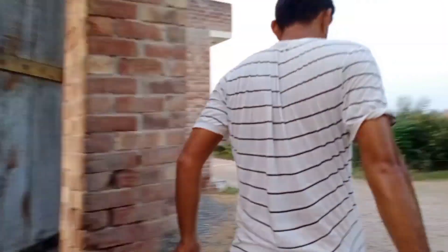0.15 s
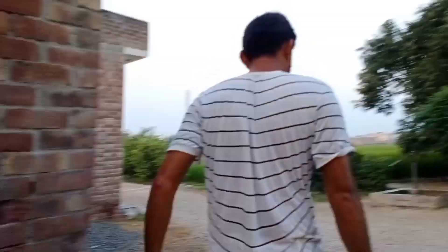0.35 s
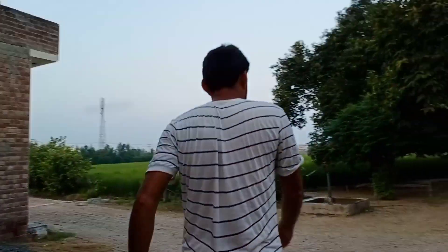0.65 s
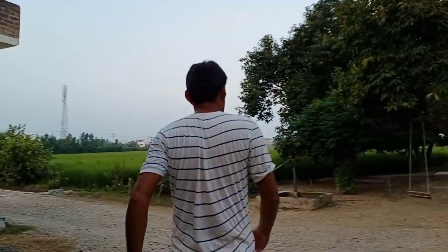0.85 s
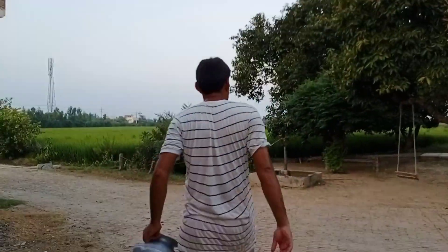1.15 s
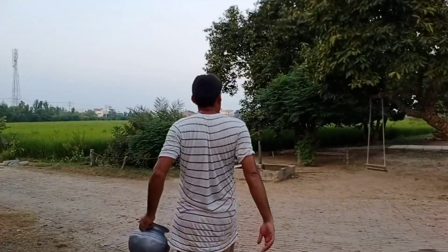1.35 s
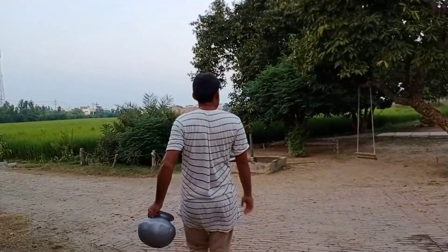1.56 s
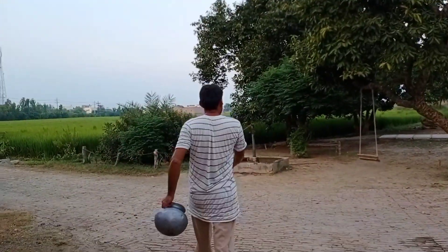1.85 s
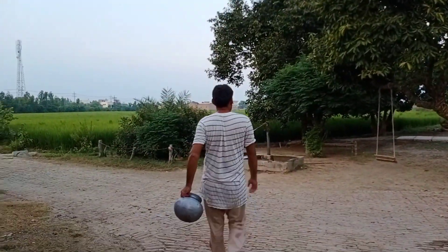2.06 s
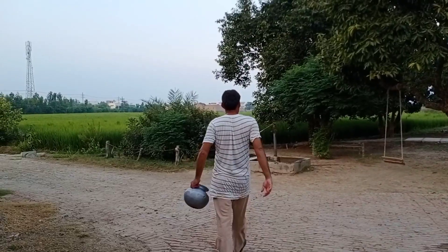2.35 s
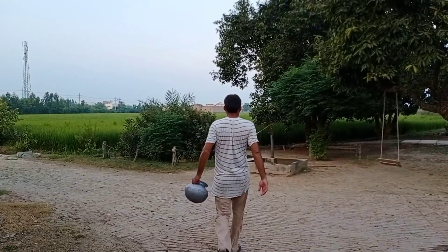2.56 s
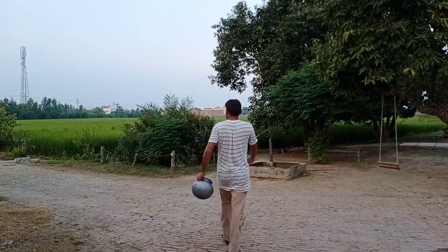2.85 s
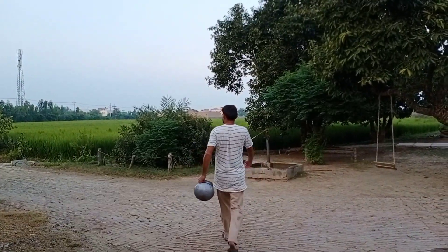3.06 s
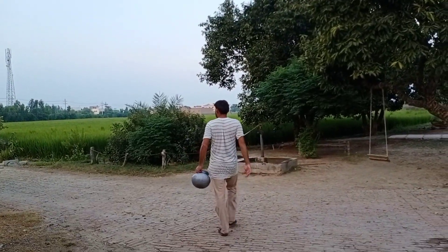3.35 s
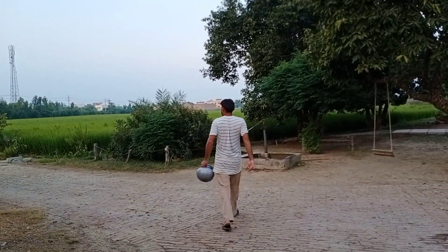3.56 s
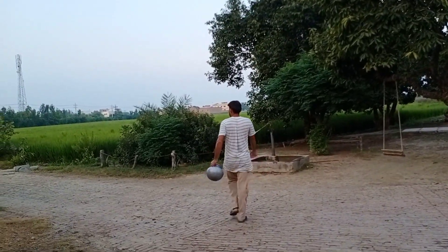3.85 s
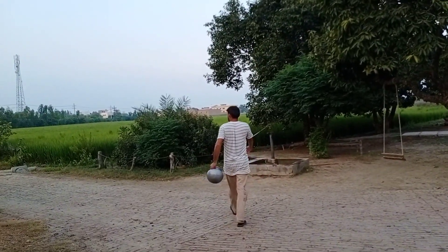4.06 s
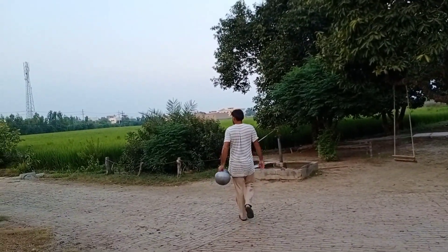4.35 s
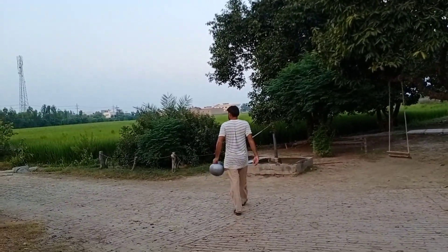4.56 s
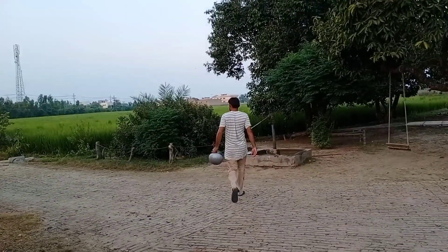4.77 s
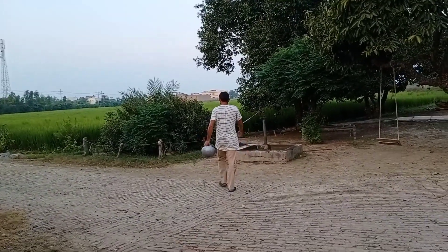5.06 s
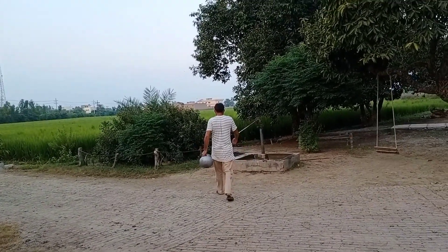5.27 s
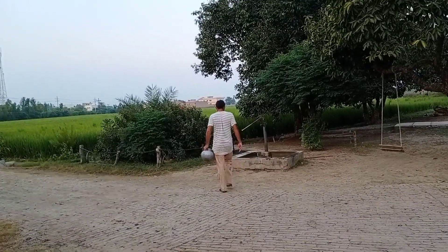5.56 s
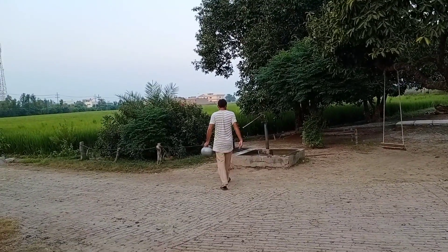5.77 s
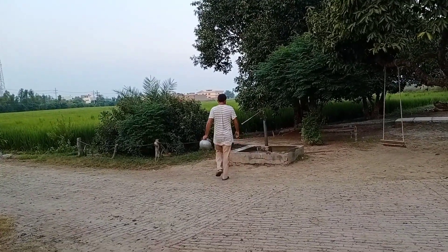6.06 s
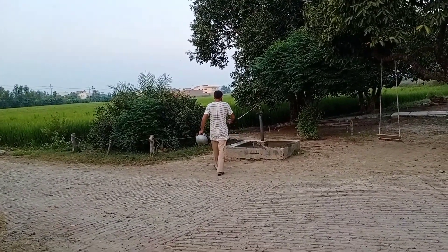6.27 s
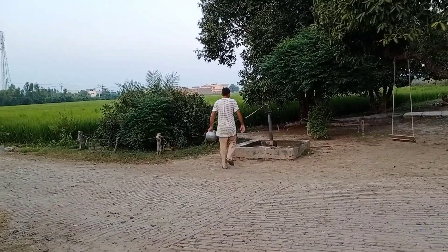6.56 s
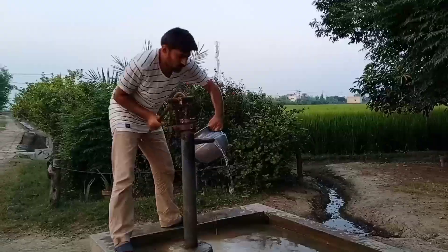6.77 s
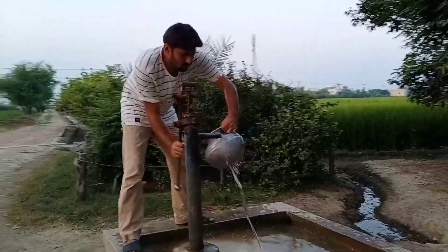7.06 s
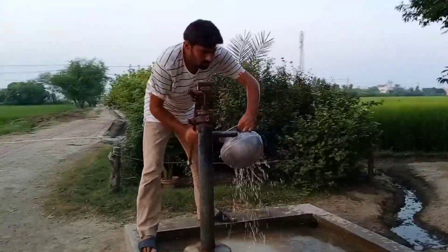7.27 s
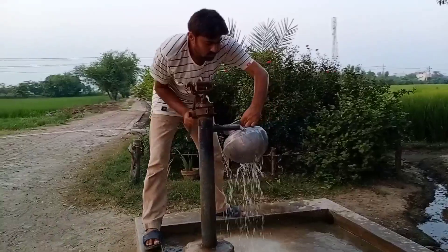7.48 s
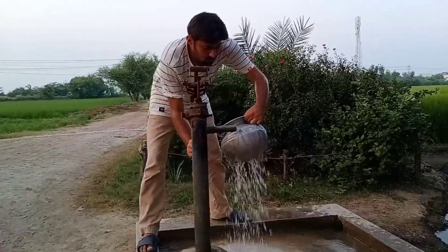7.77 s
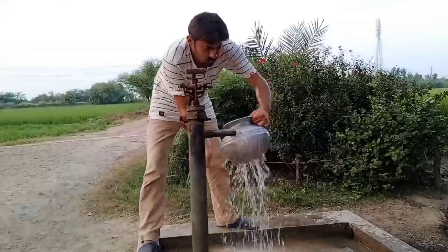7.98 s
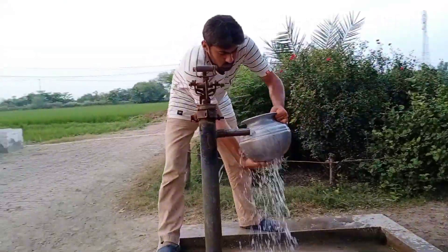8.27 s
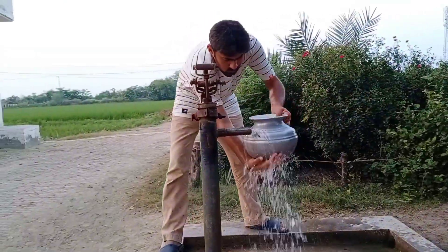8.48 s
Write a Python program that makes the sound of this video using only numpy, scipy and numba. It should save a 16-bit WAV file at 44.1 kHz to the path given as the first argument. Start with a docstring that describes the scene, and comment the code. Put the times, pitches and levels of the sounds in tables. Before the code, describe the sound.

Outdoors in a farmyard, sandals scuff gritty ground while a hen clucks softly and small birds chirp. The hen gives a thin rising whine, then a run of hoarse squawks over a faint low rumble. An abrupt cut brings a close iron hand pump, clanking and squeaking, a metal pot knocking on its spout, and water gurgling, spurting and splashing into a concrete trough.

```python
"""Sandals scuff grit in a farmyard while a hen clucks softly and small birds chirp; she whines, then squawks.
Then, close by, an iron hand pump clatters and a metal pot knocks on its spout; water gurgles and spills.
Scuffs and iron strikes are shaped noise, with ringing modes for the metal; birds are gliding tones.
The hen is a pulse train through moving throat and windpipe resonances. The water is ticks, bubbles and
spray, with plops and slapping drops in a wet concrete trough. A soft open-air bed and a rumble lie under it."""
import sys
import numpy as np
from scipy import signal
from scipy.fft import rfft, irfft
from scipy.io import wavfile
from numba import njit

SR = 44100
rng = np.random.default_rng(int(sys.argv[2]) if len(sys.argv) > 2 else 0)


def materialize(psi):
    """Save the field psi as 16-bit PCM at rate SR to the path in sys.argv[1].

    A 1-D psi becomes a single channel; in a 2-D psi each row is a channel.
    """
    bounded = np.clip(np.atleast_2d(psi).T, -1, 1)
    quanta = np.round(bounded * 32767).astype(np.int16)
    wavfile.write(sys.argv[1], SR, quanta)


N = 380583
T = np.arange(N) / SR
WATER_START_S = 6.634
# water leaving the pot, a spurt with each of the first strokes, then a steady spill: (time [s], level [dB])
FLOW_COURSE = [(6.66, -44), (6.82, -59), (7.0, -37.5), (7.13, -54.5), (7.36, -37.5), (7.75, -40.5),
               (7.79, -41.5), (7.86, -35), (8.05, -36.5), (8.63, -36.5)]


def undb(db):
    """Decibels to gain."""
    return 10 ** (np.asarray(db) / 20)


def unit(x):
    """Scale to a standard deviation of 1."""
    return x / (np.std(x) + 1e-12)


def curves(table, t=T):
    """The columns of a table, joined by straight lines in time."""
    s, *columns = np.transpose(table)
    return [np.interp(t, s, column) for column in columns]


def add(out, s, sound):
    """Mix a sound in at time s."""
    i = max(int(s * SR), 0)
    out[i:i + len(sound)] += sound[:max(N - i, 0)]


def colour(x, points):
    """Causal minimum-phase filter of the given (Hz, dB) shape; white noise keeps its level."""
    hz, db = np.transpose(points)
    size = 4096
    bins_hz = np.arange(size // 2 + 1) * SR / size
    gain = undb(np.interp(np.log(bins_hz + 1), np.log(hz), db))
    # folding the cepstrum forward puts the energy as early as possible
    cepstrum = irfft(np.log(gain))
    cepstrum[1:size // 2] *= 2
    cepstrum[size // 2 + 1:] = 0
    response = irfft(np.exp(rfft(cepstrum)))
    return signal.fftconvolve(x, response / np.linalg.norm(response))[:len(x)]


def noise(points):
    """Coloured noise of rms about 1."""
    return colour(rng.standard_normal(N), points)


def walk(rate):
    """Smooth chance with spread 1, heading for a new value rate times a second."""
    return unit(np.interp(T * rate, np.arange(N // 8), rng.standard_normal(N // 8)))


def fade(t, t60):
    """Free decay, 60 dB down at t60."""
    return np.exp(-np.log(1000) * t / t60)


def swell(t, rise, t60):
    """A contact builds up and dies away."""
    return np.minimum(t / rise, 1) * fade(np.maximum(t - rise, 0), t60)


def blows(rows):
    """Envelope of contacts (s, dB, rise s, t60 s), overlaps summed as power."""
    power, t = np.zeros(N), T[:SR // 2]
    for s, db, rise, t60 in rows:
        add(power, s - rise, (undb(db) * swell(t, rise, t60)) ** 2)
    return np.sqrt(power)


def bursts(rows, t60, spread):
    """Short dying noise bursts around one pitch; spread is the frequency ratio at which they are 9 dB down."""
    out, t = np.zeros(N), T[:SR // 4]
    for s, db, hz in rows:
        below = [(hz / spread ** 3, -34), (hz / spread, -9)]
        above = [(hz * spread, -9), (hz * spread ** 3, -28), (hz * spread ** 8, -55)]
        burst = rng.standard_normal(len(t)) * fade(t, t60)
        add(out, s, undb(db) * colour(burst, below + [(hz, 0)] + above))
    return out


def whistles(rows, waver, flutter_db, octave_db):
    """Short gliding tones (s, length s, first Hz, last Hz, dB), unsteady in pitch and strength."""
    out, wobble, flutter = np.zeros(N), walk(350), walk(180)
    for s, length, first_hz, last_hz, db in rows:
        on = slice(int(s * SR), int((s + length) * SR))
        u = np.linspace(0, 1, len(T[on]))
        glide_hz = first_hz + (last_hz - first_hz) * np.sin(u * np.pi / 2)
        phase = 2 * np.pi * np.cumsum(glide_hz * (1 + waver * wobble[on])) / SR
        tone = np.sqrt(2) * (np.sin(phase) + undb(octave_db) * np.sin(2 * phase))
        arch = 2 * np.sqrt(u * (1 - u))
        out[on] += undb(db + flutter_db * flutter[on]) * arch * tone
    return out


def ring(modes, scatter_db, detune):
    """An object's modes (Hz, dB, t60 s), shared out and tuned differently by each place of contact."""
    t = T[:int(SR * max(t60 for _, _, t60 in modes))]
    chance = rng.standard_normal((len(modes), 3))
    gains = undb(np.array(modes)[:, 1] + scatter_db * chance[:, 0])
    tones = np.zeros(len(t))
    for (hz, _, t60), gain, (_, turn, shift) in zip(modes, gains, chance):
        tones += gain * fade(t, t60) * np.sin(2 * np.pi * (hz * (1 + detune * shift) * t + turn))
    return tones * np.sqrt(2) / np.linalg.norm(gains)


def shifting(x, edges_hz, depth_db, rate):
    """Neighbouring bands swell and sink separately; the overall level stays."""
    lows = [0]
    for hz in edges_hz:
        lows.append(signal.sosfiltfilt(signal.butter(4, hz, fs=SR, output="sos"), x))
    lows.append(x)
    bands = [upper - lower for lower, upper in zip(lows, lows[1:])]
    return np.std(x) * unit(sum(band * undb(depth_db * walk(rate)) for band in bands))


def echoes(x, t60, wet_db):
    """Add the scattered reflections of ground, walls and trees as a dying noise tail."""
    t = T[:SR]
    tail = rng.standard_normal(SR) * fade(t, t60) * np.minimum(t / 0.0019, 1)
    return x + undb(wet_db) * signal.fftconvolve(x, tail / np.linalg.norm(tail))[:N]


def countryside():
    """A soft open-air noise bed, over a low distant rumble whose level wavers."""
    # rumble: (time [s], level before rumble_gain_db [dB])
    rumble_course = [(0.0, -87), (0.11, -75), (2.01, -70.5), (2.9, -62), (3.25, -52.5), (4.4, -55),
                     (5.86, -50.5), (6.45, -61.5)]
    # rumble spectrum: (frequency [Hz], relative level [dB])
    rumble_colour = [(25, -27), (50, -1.5), (70, 14), (85, 15), (110, 4.5), (150, -9.5), (220, -16.5),
                     (400, -68.5)]
    # open-air spectrum: (frequency [Hz], relative level [dB])
    field_colour = [(30, -21), (60, -24), (110, 1), (160, -5.5), (220, -16), (310, -11), (410, -22),
                    (700, -14), (1900, -17), (3150, -36.5), (3700, -35.5), (5600, -29), (7800, -40),
                    (8700, -50.5), (12000, -52.5), (15500, -43.5)]
    field_db, rumble_gain_db = -66.5, -2.5
    rumble_db, = curves(rumble_course)
    air = noise(field_colour) * undb(field_db + 0.7 * walk(3.9))
    return air + noise(rumble_colour) * undb(rumble_db + rumble_gain_db + 2.0 * walk(6.9))


def footsteps():
    """Grit crunches under the sole as grainy noise; one longer shuffle drags unevenly and clothes rub with it."""
    # sandals scuffing grit: (time [s], level [dB], t60 [s])
    scuffs = [(0.058, -65, 0.073), (0.081, -54, 0.06), (.094, -58, 0.033), (.192, -58.5, 0.11),
              (0.212, -51, 0.068), (.31, -64, 0.14), (0.656, -58, 0.063), (0.478, -43, 0.047),
              (0.798, -58.5, 0.041), (.851, -58, 0.15), (0.939, -60, 0.17), (1.046, -61.5, 0.061),
              (1.137, -30, 0.0095), (1.143, -45, 0.085), (1.156, -36.5, 0.034), (1.166, -41, 0.026),
              (1.591, -48, 0.038), (1.988, -52, 0.24), (2.007, -47, 0.04), (2.156, -43, 0.024),
              (2.432, -56, 0.017), (2.45, -61, 0.032), (3.441, -60, 0.14), (4.679, -58.5, 0.022),
              (4.698, -47.5, 0.015), (5.48, -61, 0.072)]
    # grit spectrum: (frequency [Hz], relative level [dB])
    grit_colour = [(500, -31), (1200, -33), (2300, -4), (3500, -6), (5000, -2.5), (6800, -1), (8200, -14.5),
                   (10000, -45), (13000, -24), (15500, -13)]
    # the longer shuffle: (time [s], level [dB])
    shuffle_course = [(0, -57), (.14, -69), (.2, -59), (.4, -68), (.7, -79.5), (1.0, -106)]
    # cloth spectrum: (frequency [Hz], relative level [dB])
    rustle_colour = [(150, 2), (900, 5), (1500, 1), (4000, -28)]
    grain_db, uneven_db, scuff_rise_s = 3, 2, 0.0042
    rustle_db = -6.5  # relative to the shuffle
    grit = unit(colour(rng.standard_normal(N) * undb(grain_db * walk(900)), grit_colour))
    shuffle_db, = curves(shuffle_course)
    shuffle = undb(shuffle_db + uneven_db * walk(43.0)) * (T < shuffle_course[-1][0])
    steps = blows([(s, db, scuff_rise_s, t60) for s, db, t60 in scuffs])
    rustle = noise(rustle_colour) * undb(rustle_db + 4 * walk(38.4))
    return grit * (steps + shuffle) + rustle * shuffle


def hen_clucks():
    """Soft clucks: very short tones with a strongly wavering pitch."""
    # (time [s], length [s], first pitch [Hz], last pitch [Hz], level [dB])
    clucks = [(.04, 0.039, 1584, 1435, -52.5), (.058, 0.047, 591, 480, -57.5), (.07, .03, 1080, 890, -61),
              (.275, 0.032, 548, 517, -61), (.278, .05, 1146, 1360, -57), (.445, .045, 1060, 989, -54.5),
              (.5, 0.031, 943, 704, -48.5)]
    return whistles(clucks, waver=.13, flutter_db=4, octave_db=-14)


def yard_knocks_and_cluck():
    """Hollow knocks about the yard, the last a soft cluck of the hen: narrow noise bursts that die quickly."""
    # knocks, and in the last row the cluck: (time [s], level [dB], pitch [Hz])
    knocks = [(.055, -52, 1150), (.212, -55.5, 1150), (.417, -50.5, 1430), (.477, -50.5, 1400),
              (1.158, -50.5, 1260), (1.16, -41.5, 2220), (1.55, -54, 1220), (2.003, -41, 594),
              (5.487, -50, 1130)]
    return bursts(knocks, t60=0.11, spread=1.2)


def small_birds():
    """Short upward slurs, dulled by air and leaves: some near by, fainter ones at random from a flock."""
    # the nearer chirps: (time [s], length [s], starting pitch [Hz], relative level [dB])
    chirps = [(0.414, 0.021, 2105, -54.5), (0.507, 0.064, 2490, -57.5), (0.715, 0.051, 2596, -60),
              (0.775, 0.062, 2565, -56), (0.922, 0.054, 2505, -50.5), (1.114, 0.067, 2376, -58.5),
              (1.204, 0.017, 2690, -59), (1.391, 0.024, 2090, -56.5), (1.424, 0.0306, 2684, -63),
              (1.605, 0.044, 1913, -56), (1.263, 0.044, 2710, -68), (1.966, 0.034, 1900, -53),
              (2.291, 0.086, 2560, -64.5), (3.633, 0.054, 2016, -59), (4.1, 0.04, 3130, -58.5),
              (4.992, 0.0546, 2110, -56.5), (5.157, 0.079, 2516, -52.5), (5.311, 0.092, 2530, -53),
              (5.423, 0.074, 2590, -62), (0.324, 0.033, 2204, -59), (5.831, 0.03, 2510, -60),
              (6.069, 0.029, 1680, -75), (6.334, 0.023, 2450, -65.5)]
    chirp_rise = 1.16  # last pitch over first
    flock_per_s, flock_chirp_s, flock_low_hz, flock_high_hz = 7.3, 0.032, 2050, 3170
    flock_db, flock_scatter_db = -74, 0.5  # on the same scale as the nearer chirps
    chance = rng.random((100, 3))
    times = np.cumsum(.5 + chance[:, 0]) / flock_per_s
    flock = []
    for s, (_, pitch, size) in zip(times, chance):
        if s < WATER_START_S:
            hz = flock_low_hz * (flock_high_hz / flock_low_hz) ** pitch
            flock.append((s, flock_chirp_s, hz, flock_db + flock_scatter_db * (2 * size - 1)))
    slurs = [(s, length, hz, hz * chirp_rise, db) for s, length, hz, db in chirps + flock]
    song = whistles(slurs, waver=.02, flutter_db=4, octave_db=-27)
    return .9 * signal.sosfilt(signal.butter(4, 6000, fs=SR, output="sos"), song)


def rasping_birds():
    """Harsh calls: both sides of the syrinx sound at once, chopped by a fast unsteady buzz."""
    # (time [s], lower starting pitch [Hz], upper starting pitch [Hz], level of the lower voice [dB])
    rasps = [(1.6,2126,4260,-57), (1.826,3540,5260,-59.5), (2.48,2340,4100,-61), (2.655,2080,3720,-61.5),
             (2.83,2750,5640,-63.5), (3.19,2320,4060,-64), (3.77,3360,4100,-63.5), (3.99,3930,5380,-57),
             (4.1,2110,4080,-61.5), (4.381,3030,4500,-69), (4.99,2330,4150,-64), (5.575,1775,3034,-62),
             (5.765,1760,3140,-62), (5.901,3380,4330,-64), (6.07,1857,4420,-65), (6.255,1880,3260,-63.5),
             (6.415,2210,2930,-63.5)]
    rasp_s, buzz_hz, upper_db, glide = 0.0564, 615, -7, 1.07
    rows = []
    for s, low_hz, high_hz, db in rasps:
        rows.append((s, rasp_s, low_hz, low_hz * glide, db))
        rows.append((s, rasp_s, high_hz, high_hz * glide, db + upper_db))
    buzz_phase = 2 * np.pi * np.cumsum(buzz_hz * (1 + .2 * walk(200))) / SR
    return (1 + .7 * np.sin(buzz_phase)) * whistles(rows, waver=.04, flutter_db=3, octave_db=-28)


def hen_whine():
    """A thin, drawn-out rising note; the throat favours its second harmonic."""
    # (time [s], pitch [Hz], level [dB])
    whine = [(1.68, 577, -63), (1.70, 592, -60.5), (1.808, 613, -49.5), (1.866, 640, -51.5),
             (1.885, 655, -61), (1.906, 689, -55.5), (1.93, 650, -57), (1.96, 677, -54), (2.01, 657, -45.5),
             (2.056, 664, -45), (2.08, 686, -50.5), (2.098, 719, -46), (2.13, 700, -47), (2.16, 697, -43),
             (2.204, 702, -42), (2.22, 738, -57)]
    hz, db = curves(whine)
    phase = 2 * np.pi * np.cumsum(hz * (1 + 0.0095 * walk(300))) / SR
    harmonics_db = [-16.0, 3.5, -14.5, -42, -24.0]
    tone = sum(undb(h) * np.sin((k + 1) * phase) for k, h in enumerate(harmonics_db))
    return unit(tone) * undb(db + 1.4 * walk(96)) * (T > whine[0][0]) * (T < whine[-1][0])


@njit
def resonate(x, hz, width):
    """A two-pole resonance whose centre moves."""
    y, band, low = np.empty(len(x)), 0., 0.
    for i in range(len(x)):
        g, k = np.tan(np.pi * hz[i] / SR), width / hz[i]
        v = (band + g * (x[i] - low)) / (1 + g * (g + k))
        band, low, y[i] = 2 * v - band, low + 2 * g * v, k * v
    return y


def voice(source, hoarse, throat_hz, pipe_hz):
    """Throat and windpipe resonances slide as neck and beak move: (body, overtones)."""
    # fixed shape of the throat: (frequency [Hz], relative level [dB])
    throat = [(200, -33), (330, -12.5), (420, -29.5), (540, -9.5), (700, -2), (900, -3), (1150, -3),
              (1420, 2.5), (1750, 1), (2100, -4.5), (2400, -16.5), (3000, -50)]
    # windpipe resonances: (multiple of the main one [ratio], width [Hz], relative level [dB])
    windpipe = [(.68, 171, 0.5), (.78, 195, 3.5), (1, 198, 9.5), (1.11, 180, -1.5), (1.378, 160, -3),
                (1.668, 220, -3)]
    # overtones let out by the beak: (frequency [Hz], relative level [dB])
    beak = [(1500, -27.5), (2700, 2), (7000, -1.5), (8500, -12), (11000, -50)]
    peak_db, peak_width_hz = 4, 380.  # the moving resonance, added to the fixed shape
    body = colour(source + hoarse, throat)
    body = body + undb(peak_db) * resonate(body, throat_hz, peak_width_hz)
    top = 0
    for multiple, width, db in windpipe:
        # each resonance strengthens and weakens at random within a squawk
        drift = np.interp(np.linspace(0, 4, len(source)), np.arange(5), rng.standard_normal(5))
        centre_hz = multiple * pipe_hz
        first_pass = resonate(source + hoarse / 2, centre_hz, 1. * width)
        top = top + undb(db + 4 * drift) * resonate(first_pass, centre_hz, 2. * width)
    return unit(body), unit(colour(top, beak))


def hen_squawks():
    """Each squawk opens with a clear yelp, then its pulses beat strong-weak and rasp with shifting roughness."""
    # the voice in each squawk: (pitch in the middle [Hz], share by which the ends lie above it [ratio],
    # roughness [0-1], opening yelp [s], overtones relative to the body [dB], windpipe resonance [Hz])
    squawks = [(566, 0.0029, 0.67, 0.0018, -29, 1500), (526, .06, 0.8, 0.029, -21.5, 4130),
               (667, 0.062, .9, 0.0096, -24.5, 3500), (675, .025, .3, 0.0029, -21.5, 4270),
               (693, .06, 0.97, 0.0027, -21, 4220), (722, 0.033, .65, .015, -21.5, 4200),
               (580, 0.21, .85, 0.0144, -15, 4110), (660, 0.079, .42, 0.011, -17, 4200),
               (719, 0.013, .62, 0.017, -20.5, 4580), (651, 0.083, 0.72, .024, -18.5, 3960),
               (666, 0.085, 0.7, 0.0079, -28, 7100)]
    # the course of each squawk, one list apiece: (time [s], level [dB], throat resonance [Hz])
    courses = [
        [(2.313, -68, 1560), (2.333, -47, 1570), (2.373, -48.5, 1390), (2.441, -44.5, 1410),
         (2.535, -45.5, 1400), (2.583, -38.5, 1460), (2.61, -58, 1400)],
        [(2.672, -61.5, 1320), (2.704, -35, 1330), (2.754, -48, 1500), (2.782, -47, 1680), (2.89, -40.5, 1480),
         (2.92, -51, 1460)],
        [(2.997, -48, 1380), (3.007, -37.5, 1380), (3.035, -40.5, 1400), (3.045, -44, 1380),
         (3.115, -46.5, 1610), (3.211, -38, 1500), (3.24, -66, 1620)],
        [(3.335, -63, 1410), (3.361, -36.5, 1430), (3.385, -47.5, 1480), (3.429, -42, 1620), (3.507, -42, 1510),
         (3.555, -50.5, 1530), (3.57, -73, 1490)],
        [(3.655, -58.5, 1360), (3.685, -39, 1330), (3.727, -44.5, 1240), (3.763, -43.5, 1270),
         (3.799, -43.5, 1510), (3.83, -50, 1520)],
        [(3.917, -49, 1200), (3.921, -39, 1190), (3.965, -38.5, 1370), (4.031, -41, 1460), (4.085, -40, 1460),
         (4.105, -46, 1480)],
        [(4.217, -47.5, 1340), (4.225, -37, 1330), (4.279, -39.5, 1410), (4.391, -42.5, 1480),
         (4.41, -48, 1530)],
        [(4.501, -41, 1380), (4.515, -32, 1420), (4.547, -44, 1450), (4.603, -37.5, 1420), (4.611, -39.5, 1400),
         (4.645, -49.5, 1430)],
        [(4.758, -44, 1370), (4.764, -39, 1390), (4.788, -34, 1440), (4.796, -42, 1440), (4.856, -36.5, 1410),
         (4.88, -44, 1400)],
        [(5.076, -55, 1200), (5.082, -46, 1190), (5.102, -36, 1260), (5.116, -43, 1240), (5.174, -43, 1510),
         (5.226, -42.5, 1590), (5.25, -54.5, 1560)],
        [(5.337, -52, 1420), (5.353, -35.5, 1360), (5.411, -45, 1500), (5.43, -72, 1540)],
    ]
    yelp_hz, yelp_share, yelp_dull_db = 1161, 0.61, -8
    doubling, hiss, edge_s = 0.7, 2, 0.0019
    pitch_rise = 0.0504  # share by which a squawk of roughness 1 climbs
    out, air = np.zeros(N), rng.standard_normal(N)
    shimmer, wander, jitter = undb(2.4 * walk(300)), .045 * walk(50), .07 * walk(600)
    sway, neck = undb(2 * walk(22)), 1 + .04 * walk(22)  # of roughness; of windpipe resonance
    for course, settings in zip(courses, squawks):
        pitch_hz, sag, roughness, yelp_s, overtones_db, pipe_hz = settings
        on = slice(int(course[0][0] * SR), int(course[-1][0] * SR))
        db, throat_hz = curves(course, T[on])
        t = T[on] - T[on][0]
        progress = t / t[-1]
        rough = np.minimum(roughness * sway[on], 1)
        yelp = 1 / (1 + (t / yelp_s) ** 6)
        bend = 1 + sag * (2 * progress - 1) ** 2 + pitch_rise * roughness * (progress - .5)
        held_hz = pitch_hz * bend * (1 + rough * (wander[on] + jitter[on]))
        # half the yelp pitch, since the yelp is heard as the second harmonic
        phase = 2 * np.pi * np.cumsum(yelp * yelp_hz / 2 + (1 - yelp) * held_hz) / SR
        pulses = unit(sum(np.cos(k * phase + k * k) for k in np.arange(1, 13)))
        pulses = pulses * (1 + doubling * np.sin(phase / 2)) * shimmer[on]
        hoarse = hiss * rough ** 1.4 * air[on] * shimmer[on]
        body, top = voice(pulses, hoarse, throat_hz, pipe_hz * neck[on])
        # while the beak opens, the second harmonic stands out
        clear = yelp_share * yelp
        body = body * np.sqrt(1 - clear) + np.sqrt(2 * clear) * np.sin(2 * phase)
        edges = np.minimum(np.minimum(t, t[-1] - t) / edge_s, 1)
        out[on] += edges * undb(db) * (body + top * undb(overtones_db + yelp_dull_db * yelp))
    return out


def near_walls(x):
    """Three close reflections comb the sound; their delays drift, so the notches move."""
    paths = [np.interp(T - lag_s - .00025 * walk(1.5), T, x) for lag_s in (.0013, .0031, .0087)]
    return .9 * x + .22 * sum(paths)


def hen_whistles():
    """The hen's thin high whistles: falling, nearly pure tones."""
    # (time [s], length [s], first pitch [Hz], last pitch [Hz], level [dB])
    high_whistles = [(2.84, 0.036, 6230, 5820, -63), (3.0, 0.15, 5800, 5640, -71),
                     (4.02, 0.022, 5560, 5540, -60)]
    return whistles(high_whistles, waver=.012, flutter_db=3, octave_db=-40)


def pot_ring():
    """One stroke of the thin metal shell; the water in it shifts the modes a little."""
    # shell modes: (frequency [Hz], relative level [dB], t60 [s])
    shell_modes = [(795, -2.5, 0.42), (1227, 10.5, 0.5), (1284, 14, 0.17), (1452, 2, 0.2), (1440, 0.5, 1),
                   (1840, 5, 0.27), (2440, 5.5, 0.26), (2380, 2, 0.48), (3550, -24, 0.49),
                   (3210, -11, 0.44), (4140, 7, 0.16), (4450, -14, .27), (4740, -15, .25),
                   (5600, -28, 0.41), (6000, -6, 0.18)]
    return ring(shell_modes, scatter_db=2, detune=.005)


def water():
    """Drops tick and leave tiny bubbles in the trough; the stream drums on the pot and gurgles inside it."""
    # splash spectrum: (frequency [Hz], relative level [dB])
    splash_colour = [(350, -54), (600, -25), (706, -7), (979, -38), (1200, 1), (1380, 8.5), (1730, -20.5),
                     (1990, -3), (2540, -6.5), (3660, 6), (4810, 0), (6760, 11.5), (9370, -9),
                     (11200, -13.5), (15500, 6.5)]
    # water gurgling inside the pot: (time [s], level [dB])
    gurgle_course = [(6.68, -75), (6.8, -46.5), (7.7, -45), (8.0, -41), (8.63, -39.5)]
    # gurgle spectrum: (frequency [Hz], relative level [dB])
    gurgle_colour = [(40, -17.5), (75, -4.5), (115, 4.5), (160, 3.5), (195, -12), (290, -11), (380, -28.5),
                     (650, -41), (1000, -60)]
    drops_per_s, size_spread_db, surge_db = 2200, 2.0, 2
    bubble_db, spray_db = -4, -13  # relative to the ticks
    drumming_db = -24  # relative to the splash
    (splash_db,), (gurgle_db,) = curves(FLOW_COURSE), curves(gurgle_course)
    sizes = undb(size_spread_db * np.minimum(rng.exponential(size=N), 4.5)) * rng.choice([-1, 1], N)
    ticks = sizes * (rng.random(N) < drops_per_s / SR)
    bubbles, t = np.zeros(N), T[:SR // 60]
    for when, pitch, size in rng.random((1800, 3)):
        cycles = 1700 * 5 ** pitch * t
        # a bubble rises in pitch as it nears the surface
        tone = np.sin(2 * np.pi * cycles * (1 + 0.014 * np.minimum(cycles, 30)))
        s = WATER_START_S + when * (T[-1] - WATER_START_S)
        add(bubbles, s, undb(20 * size ** 3) * tone * fade(cycles, 22))
    bubbles /= np.std(bubbles[T > WATER_START_S])
    spray = undb(spray_db) * rng.standard_normal(N)
    splash = unit(colour(unit(ticks) + undb(bubble_db) * bubbles + spray, splash_colour))
    drumming = unit(signal.fftconvolve(ticks, pot_ring())[:N])
    stream = (splash * undb(surge_db * walk(45)) + undb(drumming_db) * drumming) * undb(splash_db)
    gurgle = noise(gurgle_colour) * undb(gurgle_db + 2.0 * walk(30))
    return (stream + gurgle) * (T > WATER_START_S)


def contacts():
    """Iron on iron (s, dB, rise s, t60 s, brightness dB): strikes, a long rattle from each, the grinding rod."""
    # the loose linkage strikes: (time [s], relative level [dB], t60 [s], brightness [dB])
    clanks = [(6.637, -30.5, 0.031, -11), (6.664, -30, 0.21, 4), (6.701, -21.5, 0.041, 1),
              (6.711, -22, 0.043, 13.5), (6.725, -24, 0.069, 0), (6.774, -29.5, .036, -3),
              (6.83, -25.5, 0.032, -2), (6.885, -25, 0.03, -2), (6.906, -26, 0.11, 13),
              (6.927, -29, .05, 7), (6.943, -21, 0.041, 10), (6.947, -21.5, 0.039, 14),
              (6.957, -23.5, 0.022, 3), (6.978, -22.5, 0.046, 10), (7.156, -22, 0.11, 2),
              (7.17, -17, 0.025, 2), (7.185, -22.5, 0.059, -1), (7.211, -21.5, 0.071, -1),
              (7.24, -20, 0.037, 6), (7.352, -17.5, 0.021, 6), (7.529, -15.5, 0.02, 12),
              (7.562, -17, 0.041, 4), (7.805, -19, 0.075, 0), (7.822, -19, 0.023, -4),
              (7.876, -36, .015, -13)]
    # the rod grinds in its guide during a stroke: (time [s], relative level [dB], brightness [dB])
    grinds = [(7.03, -34.5, -6), (7.29, -28, 2), (7.326, -25.5, 11), (7.357, -27, 1), (7.863, -29, -2)]
    clank_rise_s, grind_rise_s, grind_t60_s = 0.0017, 0.03, 0.17
    rattle_db, rattle_rise_s, rattle_t60_s = -24.5, .018, 0.61  # level relative to its strike
    rows = [(s, db, clank_rise_s, t60, bright) for s, db, t60, bright in clanks]
    for s, db, _, _ in clanks:
        rows.append((s + rattle_rise_s, db + rattle_db, rattle_rise_s, rattle_t60_s, 0))
    return rows + [(s, db, grind_rise_s, grind_t60_s, bright) for s, db, bright in grinds]


def pump():
    """Iron parts chatter at each contact and ring, each a little differently; dry pivot squeaks between."""
    # colour of the chatter: (frequency [Hz], relative level [dB])
    iron_colour = [(200, -56.5), (500, -6), (790, -6.5), (950, -16), (1380, 3.5), (1800, -10), (2280, 4),
                   (2850, -3.5), (3600, 7), (4700, -5), (5600, -3.5), (6800, -7.5), (9500, -30.5),
                   (15000, -8.5)]
    # short iron rings: (frequency [Hz], relative level [dB], t60 [s])
    iron_modes = [(1400, 2.5, 0.055), (1800, -1.5, 0.19), (2206, 1, 0.11), (2677, -2, 0.22),
                  (3180, -11, 0.18), (3400, -6, 0.043), (3580, -10, 0.019), (3340, -3.5, 0.19),
                  (3766, 16.5, 0.024), (4340, 6, 0.036), (5250, -17, 0.082), (5800, -16, 0.058),
                  (5500, 2.5, 0.061), (5660, 8, 0.088), (6730, 15.5, 0.016), (7050, -27, 0.07),
                  (7750, -3, 0.052), (8200, 9, 0.0093)]
    # pivot squeaks: (time [s], length [s], first pitch [Hz], last pitch [Hz], level [dB])
    squeak_rows = [(6.77, 0.047, 3735, 3770, -36), (6.9, 0.038, 4830, 4800, -33.5),
                   (6.905, 0.024, 6720, 6700, -37), (7.315, 0.058, 3905, 3880, -32.5),
                   (7.488, 0.033, 3910, 3880, -28)]
    chatter_db, crack_db, ring_db = 2.5, -2, -6
    bright_hz = 5000  # a glancing strike favours what lies above this, a square one what lies below
    chatter = unit(rng.standard_normal(N) * undb(chatter_db * walk(700)))
    dull = signal.sosfiltfilt(signal.butter(2, bright_hz, fs=SR, output="sos"), chatter)
    cracks, rings, t = np.zeros(N), np.zeros(N), T[:SR // 3]
    for s, db, rise, t60, bright in contacts():
        on = slice(int(s * SR), int(s * SR) + len(t))
        grain = dull[on] * undb(-bright / 2) + (chatter[on] - dull[on]) * undb(bright / 2)
        contact = undb(db) * swell(t, rise, t60) * grain
        iron = ring(iron_modes, scatter_db=5, detune=.015)
        add(cracks, s - rise, contact)
        add(rings, s - rise, signal.fftconvolve(contact, iron / np.linalg.norm(iron)))
    squeaks = whistles(squeak_rows, waver=.012, flutter_db=4, octave_db=-28)
    return undb(crack_db) * colour(cracks, iron_colour) + undb(ring_db) * rings + squeaks


def pot():
    """Each knock on the spout rings the thin shell and makes the air in the belly boom."""
    # (time [s], shell ring level [dB], air boom level [dB])
    pot_knocks = [(6.637, -39.5, -35.5), (6.711, -37.5, -43.5), (6.833, -39.5, -55.5), (6.981, -32, -41),
                  (7.172, -45, -43.5), (7.236, -33.5, -41), (7.29, -29.5, -23), (7.536, -28, -46),
                  (7.804, -35.5, -50), (7.957, -57, -38.5), (8.205, -42, -45.5)]
    air_hz, air_t60_s = 290.4, 0.27
    out, t = np.zeros(N), T[:SR // 2]
    boom = np.sqrt(2) * np.sin(2 * np.pi * air_hz * t) * fade(t, air_t60_s) * np.minimum(t / 0.003, 1)
    for s, shell_db, air_db in pot_knocks:
        add(out, s, undb(shell_db) * pot_ring())
        add(out, s, undb(air_db) * boom)
    return out


def plops():
    """Fat bubbles ring for a number of cycles, gliding up as they reach the surface; they follow the flow."""
    plops_per_s, low_hz, high_hz = 60, 1600, 7500
    ring_cycles, glide = 35, .12
    quietest_db, size_range_db = -6, 10  # relative to the splash
    out, t = np.zeros(N), T[:SR // 12]
    span = T[-1] - WATER_START_S
    for when, pitch, size in rng.random((int(plops_per_s * span), 3)):
        s = WATER_START_S + when * span
        splash_db, = curves(FLOW_COURSE, s)
        cycles = low_hz * (high_hz / low_hz) ** pitch * t
        tone = np.sin(2 * np.pi * cycles * (1 + glide * np.minimum(cycles / ring_cycles, 1)))
        add(out, s, undb(splash_db + quietest_db + size_range_db * size) * tone * fade(cycles, ring_cycles))
    return out


def droplets():
    """Gobs fall at random and break into clusters of drops that follow the flow: (s, dB, pitch Hz, t60 s)."""
    gobs_per_s, drops_per_gob, gob_spread_s, drop_t60_s = 45, 4, .018, .009
    drop_db, scatter_db = 2, 6  # relative to the flow, before the level of all splats
    low_hz, high_hz = 1740, 7900
    span = T[-1] - WATER_START_S
    gobs = WATER_START_S + span * rng.random(int(gobs_per_s * span))
    late, size, pitch = rng.random((len(gobs) * drops_per_gob, 3)).T
    s = np.repeat(gobs, drops_per_gob) + gob_spread_s * late
    db = curves(FLOW_COURSE, s)[0] + drop_db + scatter_db * (2 * size - 1)
    hz = low_hz * (high_hz / low_hz) ** pitch
    return list(zip(s, db, hz, np.full(len(s), drop_t60_s)))


def splats():
    """Drops slap the wet concrete: broad noise cracks, each centred on its own pitch."""
    # big drops: (time [s], relative level [dB], pitch [Hz], t60 [s])
    big_drops = [(7.452, -27.5, 6500, .02), (7.683, -27, 6550, 0.049), (7.776, -22.5, 6600, 0.014),
                 (7.921, -27, 5500, 0.017), (7.999, -20.5, 2200, 0.022), (8.037, -25, 3000, 0.051),
                 (8.106, -25, 1990, 0.027), (8.149, -24.5, 5730, 0.02), (8.162, -26, 4460, 0.01),
                 (8.2, -28, 6600, 0.014), (8.207, -24, 650, 0.098), (8.244, -22.5, 5900, 0.016),
                 (8.25, -31, 5000, .05), (8.301, -33, 5900, 0.015), (8.36, -26, 4800, 0.028),
                 (8.412, -24.5, 6670, 0.042), (8.452, -30, 5000, 0.07), (8.528, -25, 2430, 0.041)]
    # colour of the slaps: (frequency [Hz], relative level [dB])
    splat_colour = [(300, -17), (650, -2), (950, -21), (1400, -8), (2200, 0.5), (7200, 4), (9500, -12),
                    (11500, -7), (15000, -4.5)]
    rise_s, splats_db = .002, -4.5
    out, t = np.zeros(N), T[:SR // 12]
    for s, db, hz, t60 in big_drops + droplets():
        hump = [(hz / 4, -20), (hz / 1.5, -6), (hz, 0), (hz * 1.5, -6), (hz * 4, -13)]
        slap = rng.standard_normal(len(t)) * swell(t, rise_s, t60)
        add(out, s - rise_s, undb(db) * colour(slap, hump))
    return undb(splats_db) * colour(out, splat_colour)


def piston_thuds():
    """The piston thuds in the barrel: low, broad noise bursts."""
    # (time [s], level [dB], pitch [Hz])
    thuds = [(6.712, -40, 700), (7.16, -44.5, 560), (7.19, -45, 676), (7.214, -38, 594),
             (7.245, -39.5, 515), (7.28, -34, 570), (7.806, -40, 770), (7.865, -40, 790)]
    return bursts(thuds, t60=0.086, spread=1.4)


def scene():
    """Hen and birds among walls and trees, pump and water close by."""
    yard = echoes(footsteps() + yard_knocks_and_cluck(), t60=0.14, wet_db=-7.0)
    chirping = echoes(small_birds(), t60=.55, wet_db=-.5)
    calling = echoes(rasping_birds() + hen_whistles(), t60=.35, wet_db=-7)
    squawks = shifting(hen_squawks(), (1100, 1550, 2500, 3600, 5000), depth_db=2.5, rate=35)
    hen = echoes(hen_clucks() + hen_whine() + near_walls(squawks), t60=0.61, wet_db=-16)
    spill = shifting(water(), (900, 2900, 5200), depth_db=2.2, rate=55)
    close_by = spill + pump() + pot() + plops() + splats() + piston_thuds()
    trough = echoes(close_by, t60=0.51, wet_db=-11.5)
    return (countryside() + yard + chirping + calling + hen + trough)[None]


def record(dry):
    """A steep low-pass takes off the top of the treble, above 15800 Hz."""
    return signal.sosfilt(signal.ellip(10, .2, 70, 15800, fs=SR, output="sos"), dry)


dry = scene()
out = record(dry)
materialize(out)
```